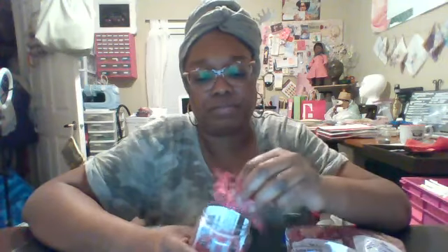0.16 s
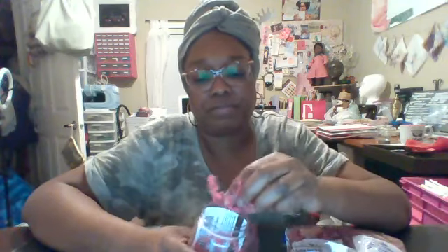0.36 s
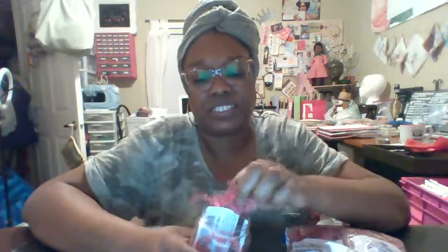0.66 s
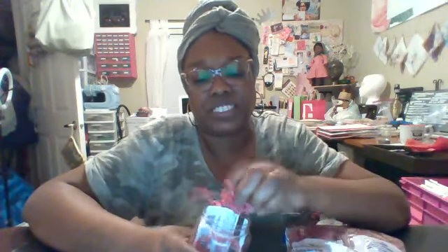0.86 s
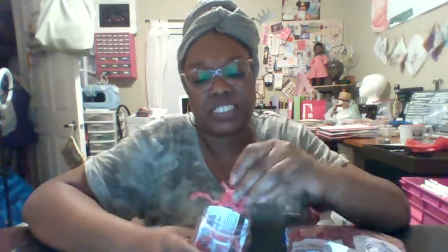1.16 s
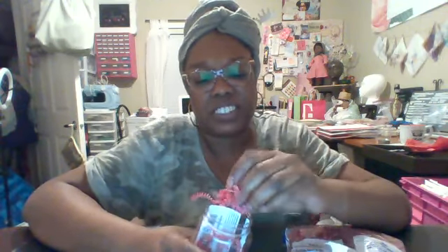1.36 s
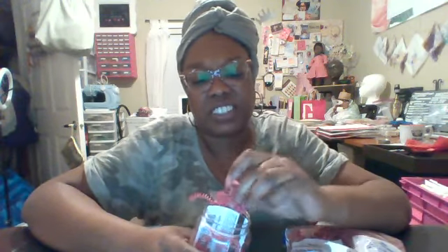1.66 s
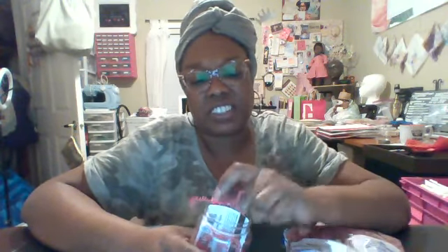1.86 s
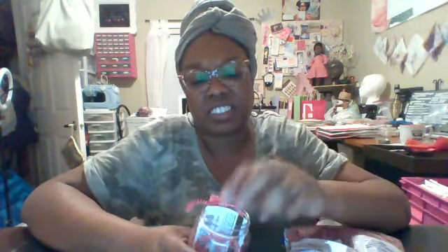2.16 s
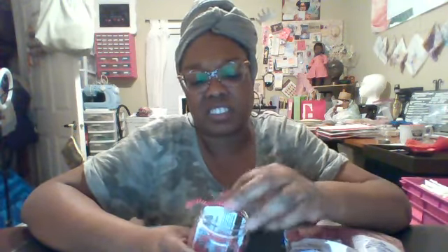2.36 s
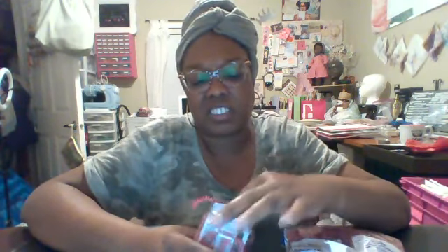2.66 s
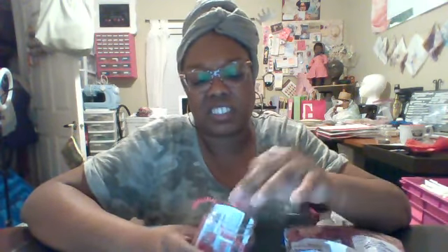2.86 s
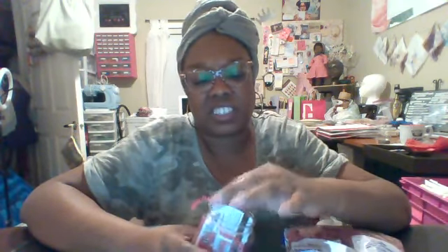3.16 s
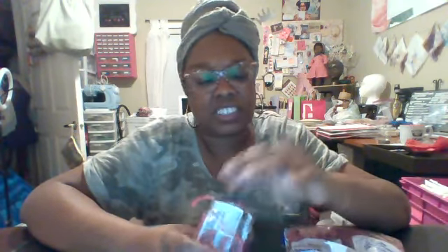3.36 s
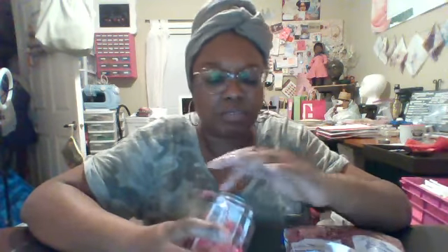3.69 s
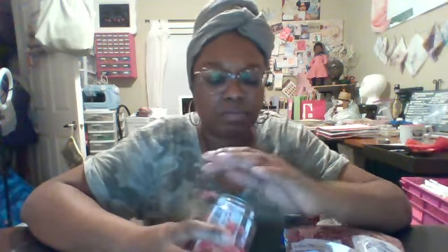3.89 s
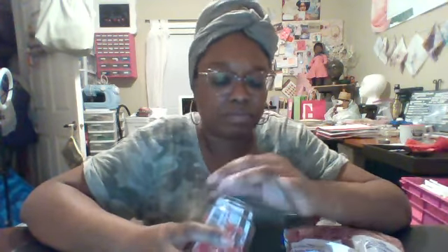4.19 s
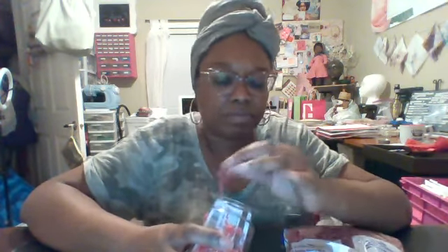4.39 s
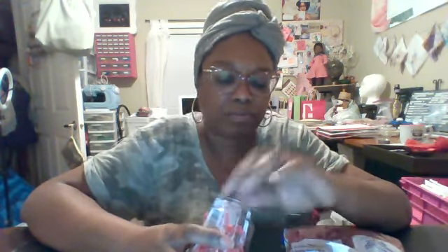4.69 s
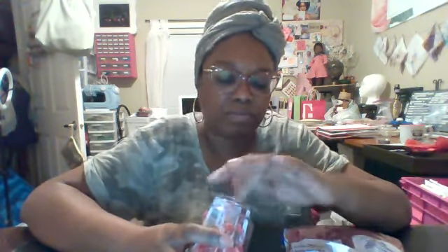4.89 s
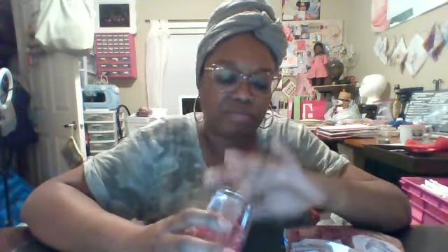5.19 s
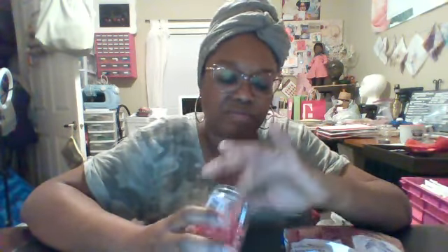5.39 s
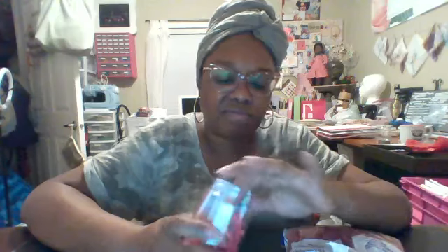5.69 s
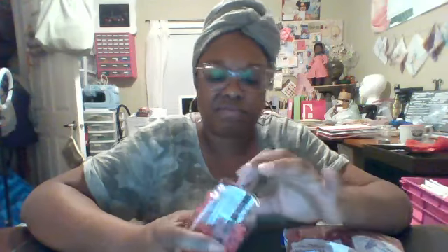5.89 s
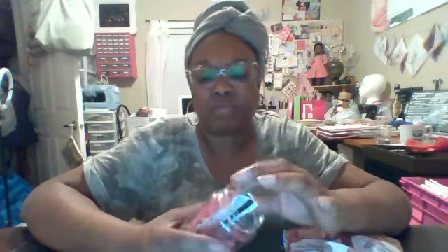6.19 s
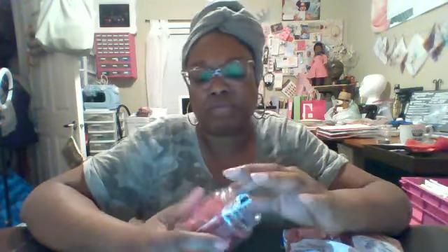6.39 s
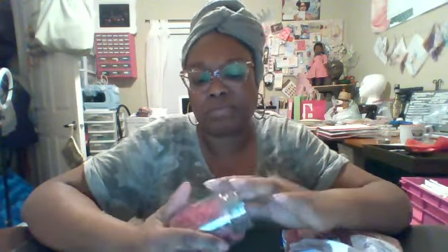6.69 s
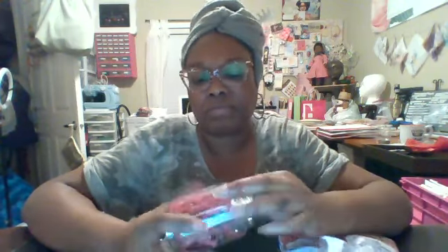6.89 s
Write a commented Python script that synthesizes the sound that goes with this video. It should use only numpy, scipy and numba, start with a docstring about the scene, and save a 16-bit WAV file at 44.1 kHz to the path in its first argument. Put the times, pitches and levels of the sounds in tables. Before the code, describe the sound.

Crinkly paper shreds are stuffed into a small plastic jar in uneven bursts, with sharp snaps, hollow plastic knocks and a quiet room's faint hum.

```python
"""Paper shreds in a plastic jar

A hand stuffs crinkled paper shreds into a small plastic jar, then turns the jar over, close to a microphone.
Strands rub and buckle in bursts of filtered noise and tiny ticks; paper and nails snap against the wall as
short noise pulses. Resonant filters make the jar's air and wall ring, also for drags over the plastic.
Low thuds are short dying tones: table bumps, and the short low body of one hard snap.
A small furnished room rumbles, hisses and hums faintly."""
import sys
import numpy as np
from scipy import signal
from scipy.fft import rfft, irfft, next_fast_len
from scipy.io import wavfile
from scipy.ndimage import uniform_filter1d
from numba import njit

SR = 44100
rng = np.random.default_rng(int(sys.argv[2]) if len(sys.argv) > 2 else 0)


def store_pcm(level_fs):
    """Save levels as 16-bit WAV."""
    pcm = np.round(np.clip(level_fs, -1, 1) * 32767).astype(np.int16)
    wavfile.write(sys.argv[1], SR, np.atleast_2d(pcm).T)


N = 310905
TIME = np.arange(N) / SR

# tone colour of the fine paper sizzle; only its shape counts: (frequency [Hz], level [dB])
SIZZLE_COLOUR = [(5500, -66), (7700, 2), (8700, 5.5), (10200, 4), (12500, 5), (15000, 4), (16500, -29.5)]
# pitch of the air in the jar, set by how far the hand covers its mouth: (time [s], pitch [Hz])
AIR_PITCH = [(0, 753), (1.3, 713), (1.85, 746), (2.4, 715), (5.2, 779), (5.4, 810), (5.5, 760), (5.7, 777),
             (6.15, 741), (6.72, 725), (6.85, 976), (6.93, 750), (7.05, 743)]
# how strong the difference between the two microphone ports is against their sum, before its bass is cut
PORT_SIDE_DB = -3


def undb(db):
    """Turn decibels into a gain."""
    return 10 ** (np.asarray(db) / 20)


def unit(x):
    """Scale a sound to an rms level of 1."""
    return x / np.sqrt(np.mean(x ** 2))


def colour(x, points):
    """Filter a sound through (Hz, dB) points without any sound before its cause (minimum phase)."""
    size = next_fast_len(x.shape[-1] + 2048) * 2
    hz, db = np.transpose(points)
    bin_hz = np.arange(size // 2 + 1) * SR / size
    gain_db = np.interp(np.log(bin_hz + 1), np.log(hz), db)
    # folding the cepstrum (the spectrum of the log gain) gives the matching phase
    cepstrum = irfft(np.log(undb(gain_db)))
    cepstrum[1:size // 2] *= 2
    cepstrum[size // 2 + 1:] = 0
    response = np.exp(rfft(cepstrum))
    return irfft(rfft(x, size) * response)[..., :x.shape[-1]]


def walk(rate):
    """Random wandering of rms 1: straight lines between chance values, `rate` of them per second."""
    k = int(SR / rate)
    steps = np.repeat(rng.standard_normal(N // k + 1), k)
    return unit(uniform_filter1d(steps, k)[:N])


def two_ports(pair, side_db, side_hz):
    """Mid and side to left and right: short waves reach the two ports differently, long ones alike."""
    diffuse = 0.61  # share of the side's power that is independent of the mid
    paths = rng.standard_normal(41)
    paths = paths - paths[::-1]
    shifted = np.convolve(pair[0], paths / np.linalg.norm(paths), "same")
    side = np.sqrt(diffuse) * pair[1] + np.sqrt(1 - diffuse) * shifted
    side = undb(side_db) * signal.lfilter(*signal.butter(1, side_hz, "high", fs=SR), side)
    return np.array([pair[0] + side, pair[0] - side])


@njit
def resonance(x, hz, width):
    """Band-pass filter whose centre may move, with gain 1 at the centre."""
    y, band, low = np.empty(len(x)), 0., 0.
    for i in range(len(x)):
        g, k = np.tan(np.pi * hz[i] / SR), width / hz[i]
        v = (band + g * (x[i] - low)) / (1 + g * (g + k))
        band, low, y[i] = 2 * v - band, low + 2 * g * v, k * v
    return y


def ring(x, hz, width):
    """One resonance at a fixed or moving pitch."""
    return resonance(np.ascontiguousarray(x), hz * np.ones(len(x)), float(width))


def double_ring(x, hz, width):
    """The same resonance twice in a row, for steeper sides."""
    return ring(ring(x, hz, width), hz, width)


def jar_air(x, hz):
    """The air in the jar rings like a short closed pipe, with dark valleys between its resonances."""
    # air resonances: (multiple of the air pitch, width of each filter pass [Hz], level [dB])
    air_modes = [(1, 140, 0), (2.9, 330, -20), (3.35, 330, -21)]
    return sum(undb(db) * double_ring(x, hz * multiple, width) for multiple, width, db in air_modes)


def wall_spot(x, hz):
    """The struck patch of plastic rings for a few cycles, on top of the blow itself."""
    q = 13  # sharpness: pitch divided by width
    # resonances of a struck spot: (multiple of its ring pitch, level [dB])
    spot_modes = [(1, 9), (1.65, -1.5)]
    return x + sum(undb(db) * ring(x, hz * multiple, hz * multiple / q) for multiple, db in spot_modes)


def crinkles(per_s, spread_db, slide_db):
    """Tiny buckles of very unequal size over the smooth hiss of sliding strands."""
    happens = rng.random(N) < per_s / SR
    sizes = happens * undb(spread_db * np.minimum(rng.exponential(size=N), 4.5))
    decay_s = 0.0015
    bursts = signal.lfilter([1], [1, -np.exp(-1 / (decay_s * SR))], sizes)
    buckles = unit(bursts * rng.standard_normal((2, N)))
    hiss = undb(slide_db) * rng.standard_normal((2, N))
    return unit(buckles + hiss)


def room_tone():
    """Steady low rumble and faint hiss from filtered noise, with a hum of wavering phase and level."""
    floor_db, hum_hz, hum_db = -55.0, 121, -71
    # tone colour of the quiet room; only its shape counts: (frequency [Hz], level [dB])
    tone_colour = [(20, -1.5), (33, -3), (48, 2.5), (70, -4), (100, -12), (125, -5.5), (160, -16),
                   (250, -23), (350, -27.5), (440, -26.5), (600, -33.5), (1500, -39), (6000, -43),
                   (16000, -42)]
    mid, side = colour(rng.standard_normal((2, N)), tone_colour)
    air = unit(mid + np.array([[.32], [-.32]]) * side)
    hum = np.sqrt(2) * np.sin(2 * np.pi * hum_hz * TIME + 1.24 * walk(12))
    hum *= undb(hum_db + 1.0 * walk(3.6))
    return undb(floor_db) * air + hum


def snaps():
    """Each snap is a quick chain of buckles that rings the struck spot, followed by the shreds settling."""
    # rise and fall time constants, as shares of a snap's length
    lead, fade = .5, 1.65
    # the settling shreds: starting level against the chain, and decay time
    tail_db, tail_s = -19, 0.0053
    spike = 0.8  # how uneven the buckles are
    # stiffer spots crack harder: the crack has the snap's level at this ring pitch and grows with it
    crack_even_hz, crack_db_per_octave = 2130, 3.5
    pan_db = 0.5  # left minus right
    # snaps of paper and nails on the jar; a bright one is mostly paper, a dull one mostly wall:
    # (time of peak [s], length scale [s], level as rms over 8 ms [dB],
    #  brightness, added to sizzle and taken from knock [dB], jar air against level [dB], ring pitch [Hz])
    snap_list = [(0.035, .002, -59, 10, -11, 2550), (0.045, 0.0017, -47, -11.5, 11.5, 2540),
                 (0.076, 0.0035, -49.5, 12, -2, 3630), (.1715, 0.0018, -42, -2.5, -4, 3980),
                 (0.339, 0.0014, -56, 9, -6, 4350), (0.368, 0.0079, -46, 6.5, -3, 2470),
                 (.436, 0.002, -44.5, 4.5, -25, 4530), (.6588, 0.003, -34.5, -2, -20, 1590),
                 (0.7414, .0018, -37, 6.5, -20, 3520), (0.964, .0023, -51.5, -5, 3.5, 2030),
                 (1.183, 0.0032, -55.5, 7, 2.5, 2290), (1.338, .006, -50.5, 2, -4, 2450),
                 (1.433, .003, -47, 7, -2, 2490), (1.47, .002, -57, -4, 7, 2300),
                 (1.684, 0.0045, -51.5, -1, -8, 4300), (1.8177, .0035, -53, -1, 4, 1430),
                 (1.8598, 0.0043, -39.5, 3, -0.5, 1290), (1.8925, .0047, -41.5, 6.5, -19, 2290),
                 (1.914, .0036, -50, 7, 1, 3540), (1.9338, 0.0023, -36.5, 4.5, -8, 4800),
                 (1.945, 0.0032, -38, -2, -18, 3150), (1.9745, .0008, -49, -12.5, -13, 1310),
                 (2.054, .004, -46.5, -9.5, -23, 2300), (2.071, 0.0022, -40.5, -3, -7, 2210),
                 (2.383, 0.0041, -44, -1.5, 4.5, 3600), (2.9207, 0.002, -58, -8.5, 3.5, 2450),
                 (3.006, 0.0019, -51.5, -4, -3, 2360), (3.0727, 0.0024, -46.5, -0.5, -5.5, 2050),
                 (3.4575, 0.00073, -60.5, 7.5, -20, 4970), (3.5226, .001, -59, 20.5, -13, 4650),
                 (3.5405, 0.0036, -49, 3, -9, 1430), (3.565, 0.0055, -51, 17.5, -19, 4400),
                 (4.37, 0.0028, -42, -4.5, -2.5, 1310), (4.399, 0.0051, -42, -2.5, 1.5, 1250),
                 (5.209, .0043, -35, 0.5, 4, 3040), (5.398, 0.0027, -38, 11.5, -10.5, 5060),
                 (5.4713, .0022, -53, 1, 5, 2330), (6.141, 0.0018, -52, -2.5, 16.5, 2260),
                 (6.215, 0.0016, -54, -0.5, -14, 1370), (6.4264, 0.00034, -55, -18.5, -2, 1920),
                 (6.735, 0.0015, -47, 0, -10, 1220), (6.828, 0.0035, -65, -9, 11, 1840),
                 (6.852, 0.0018, -51.5, -4, 10, 1220), (6.941, 0.0018, -47, -0.5, -3, 3150),
                 (6.999, 0.0033, -43.5, 1, -3, 2020), (7.012, 0.0073, -39.5, -1.5, -9, 1360),
                 (7.035, .0026, -46, 0, 8, 1360)]
    # tone colour of the knock on the wall; only its shape counts: (frequency [Hz], level [dB])
    knock_colour = [(100, -26), (300, -14), (550, -11), (800, -8), (1250, -1), (2000, 0), (2700, -2),
                    (3400, -4), (4200, -20), (8000, -45)]
    # tone colour of the crack; only its shape counts: (frequency [Hz], level [dB])
    crack_colour = [(1500, -16.5), (2800, 3), (3600, 6), (5000, 4), (7000, 3), (9000, -5), (15000, -54)]

    out = np.zeros((2, N + SR))
    t = np.arange(-256, 4096) / SR
    blow = .008 * SR  # samples over which the levels count
    pan = undb(np.array([[pan_db], [-pan_db]]) / 2)
    for s, length, level_db, bright_db, hollow_db, ring_hz in snap_list:
        knock_db, sizzle_db, air_db = level_db - bright_db, level_db + bright_db, level_db + hollow_db
        crack_db = level_db + crack_db_per_octave * np.log2(ring_hz / crack_even_hz)
        air_hz = np.interp(s, *np.transpose(AIR_PITCH))
        span = abs(t) / max(length, 1e-4)
        settling = undb(tail_db) * np.exp(-abs(t) / tail_s)
        shape = np.where(t < 0, np.exp(-span / lead), np.exp(-span / fade) + settling)
        # the chain peaks for a moment as the main fold gives way
        shape = shape * (1 + .9 * np.exp(-abs(t) / .0004))
        unevenness = np.exp(spike * np.clip(rng.standard_normal(len(t)), -2, 2))
        chain = shape * rng.standard_normal((2, len(t))) * unevenness
        # the hardest contact is one sharp push on the wall
        push = chain / np.sqrt(np.sum(chain[0] ** 2))
        push[0, np.argmin(abs(t))] += 1.1
        air = jar_air(push[0], air_hz) * np.ones((2, 1))
        push = np.array([wall_spot(x, ring_hz) for x in push])
        chain = np.array([wall_spot(x, ring_hz) for x in chain])
        # a small, stiff spot radiates little bass
        push = signal.lfilter(*signal.butter(1, .3 * ring_hz, "high", fs=SR), push)
        knock = two_ports(colour(push, knock_colour), PORT_SIDE_DB, side_hz=1540)
        crack = two_ports(colour(chain, crack_colour), PORT_SIDE_DB, side_hz=2020)
        sizzle = two_ports(colour(chain, SIZZLE_COLOUR), PORT_SIDE_DB, side_hz=2000)
        parts = [(air, air_db), (knock, knock_db), (crack, crack_db), (sizzle, sizzle_db)]
        start = max(int((s + t[0]) * SR), 0)
        for part, db in parts:
            out[:, start:start + len(t)] += unit(part) * undb(db) * pan * np.sqrt(blow / len(t))
    return out[:, :N]


def stroke_levels():
    """Levels of rustle, sizzle and jar air: each stroke builds, arches and dies away; overlaps add in power."""
    # time constants of every stroke, and how far its ends lie under its middle
    attack_s, release_s, arch_db = 0.02, 0.027, 0.48
    rest_db = -75  # the wad keeps stirring faintly between strokes
    # strokes of the hand through the paper, levels before the arch is applied:
    # (start [s], length [s], rustle level [dB], sizzle against rustle [dB], jar air against rustle [dB])
    stroke_list = [(0.037, 0.058, -51, 3.5, -22), (0.145, 0.086, -55.5, 4.5, -26),
                   (0.319, 0.074, -50.5, -1, -8.5), (0.448, 0.036, -54.5, 1, -20.5),
                   (0.547, 0.062, -56.5, 2, -8), (0.677, 0.082, -51, 2.0, -8.5),
                   (0.825, 0.081, -45.5, 0.5, -11), (1.016, 0.05, -51, 0.5, -7),
                   (1.159, 0.17, -60.5, 7.5, -0.5), (1.289, 0.16, -54.0, 4.5, -14),
                   (1.513, 0.1, -61, 5.0, -9), (1.753, 0.066, -50, -1.0, -7), (1.896, 0.063, -43, -3, -15),
                   (2.053, 0.019, -44.0, -7, -18), (2.136, 0.019, -49, 4.5, -3.5),
                   (2.392, 0.053, -49, -1, -11), (2.508, 0.095, -53.5, 2, -6.5),
                   (2.692, 0.013, -51, 0.5, -2), (2.767, 0.043, -50.5, 1, -8.5),
                   (2.932, 0.073, -54.5, 0.5, -22), (3.03, 0.053, -60.5, -3.5, -30),
                   (3.225, 0.055, -52.0, -4.5, -13), (3.387, 0.031, -58.5, -1.5, -13),
                   (3.536, 0.043, -51.5, 1, -24), (3.927, 0.014, -65, -1, -6),
                   (4.176, 0.043, -64.5, -2, -0.5), (4.247, 0.066, -64, 3.5, -7), (4.4, 0.07, -57, -3, -17),
                   (4.88, 0.1, -73, 6.5, -14.0), (5.176, 0.088, -52, -2, -3.5),
                   (5.29, 0.14, -55.5, -2.5, -3.5), (5.48, 0.04, -66.5, -3, 3.5),
                   (5.648, 0.14, -63.5, -3, -1), (5.849, 0.049, -57.5, 1, -11), (6.112, 0.2, -64, -9, -4),
                   (6.357, 0.14, -59, -3, -4.5), (6.647, 0.058, -53.5, -5.5, 12.5),
                   (6.742, 0.052, -58.0, -5, -17), (6.852, 0.1, -54, -9.5, -11.5),
                   (6.984, 0.087, -48.5, -14, -0.5)]
    power = np.full((3, N), undb(rest_db) ** 2) * np.array([[1], [1], [0]])
    for start, length, db, sizzle_db, air_db in stroke_list:
        t = TIME - start
        arch = undb(arch_db * (np.sin(np.pi * np.clip(t / length, 0, 1)) - 1.5))
        build = np.minimum(t, 0) / attack_s
        relax = np.maximum(t - length, 0) / release_s
        shape = arch * np.exp(build - relax)
        peak_power = undb([db, db + sizzle_db, db + air_db]) ** 2
        power += np.outer(peak_power, np.maximum(shape, 1e-6) ** 2)
    return 10 * np.log10(power)


def ticks(per_s, spread_db):
    """Single folds flicking over: each is a crisp tick of a few cycles at its own pitch."""
    count = 7000  # candidates, of which chance keeps enough for the wanted rate
    t = np.arange(200) / SR
    when, pitch, size, turn, chance = rng.random((count, 5)).T[:, :, None]
    hz = 1500 + 13000 * pitch ** 1.5
    kept = chance < per_s * N / SR / count
    # higher ticks die sooner, so they start stronger
    gain = np.sqrt(hz) * undb(spread_db * np.minimum(-np.log(1 - size), 4)) * kept
    folds = gain * np.exp(2j * np.pi * (hz * t + turn) - t * hz / 6)
    places = (when * N).astype(int) + np.arange(len(t))
    mid_side = (folds.real, folds.imag * np.cos(np.pi * when * N))
    out = [np.bincount(places.ravel(), part.ravel(), N)[:N] for part in mid_side]
    return unit(np.array(out))


def paper():
    """The wad rubs along the wall in small catches and slips, and stirs the air in the jar."""
    # rustle level around which folds start to give way, and how gradually
    crunch_db, crunch_range_db = -52, 5
    # the finest fibres whisper at the very top when the touch is light: centre and width of each filter
    # pass, level against the sizzle, and growth in dB per dB of sizzle over rustle
    fibre_hz, fibre_width_hz, fibre_db, fibre_growth = 14150, 3700, -9.5, 1
    # tone colour of the rustle; only its shape counts: (frequency [Hz], level [dB])
    rustle_colour = [(120, -10.5), (200, -1), (330, -8), (450, 2), (600, 1), (1050, -2.5), (1700, -7.5),
                     (2200, -3), (3000, -5.5), (4300, -3.5), (6500, -8.5), (7600, -6.5), (9000, -27)]

    rustle_db, sizzle_db, air_db = stroke_levels()
    catches = undb(3.46 * walk(110))
    rubbing = crinkles(per_s=1100, spread_db=1.0, slide_db=3.5) * catches
    # a light touch only slides; folds give way when the hand presses harder
    pressure = 1 / (1.5 + np.exp((crunch_db - rustle_db) / crunch_range_db))
    folds = 1.4 * ticks(per_s=520, spread_db=4.6) * catches
    grains = (rubbing + pressure * folds) / np.hypot(1, pressure)

    rustle = unit(two_ports(colour(grains, rustle_colour), PORT_SIDE_DB, side_hz=2100)) * undb(rustle_db)
    sizzle = unit(two_ports(colour(grains, SIZZLE_COLOUR), PORT_SIDE_DB, side_hz=2100)) * undb(sizzle_db)

    fine_grains = crinkles(per_s=540, spread_db=2.0, slide_db=6) * catches
    finest = [double_ring(x, fibre_hz, fibre_width_hz) for x in fine_grains]
    whisper_db = sizzle_db + fibre_db + fibre_growth * (sizzle_db - rustle_db)
    fibres = unit(two_ports(finest, PORT_SIDE_DB, side_hz=2100)) * undb(whisper_db)

    stirring = rubbing[0] * undb(2 * walk(60))
    air_hz = np.interp(TIME, *np.transpose(AIR_PITCH))
    air = unit(jar_air(stirring, air_hz)) * undb(air_db)
    return rustle + sizzle + fibres + air


def low_thuds():
    """Low tones that rise at once and die away: table bumps, and the short low body of a hard snap."""
    rise_s = 0.00083
    # low thuds: table bumps, and the short low body of the hard snap at .659 s:
    # (time [s], pitch [Hz], peak level before rise and decay [dB], decay time constant [s])
    thud_list = [(.659, 326, -30, 0.0022), (1.122, 60, -40, 0.06), (1.14, 129.4, -40.5, 0.028),
                 (2.025, 63.5, -53, .025), (3.524, 92, -34.5, 0.022), (3.55, 150, -33, 0.0096),
                 (3.632, 94, -33.5, 0.013), (4.194, 51.7, -44.5, 0.086)]
    out = np.zeros(N)
    for s, hz, db, decay in thud_list:
        t = np.maximum(TIME - s, 0)
        swing = np.sin(2 * np.pi * hz * t)
        out += undb(db) * swing * (1 - np.exp(-t / rise_s)) * np.exp(-t / decay)
    return out


def drags_and_low_body():
    """Crinkle noise rings a resonance: drags over the plastic, and the low body under some snaps."""
    # drags over the plastic, and the low body under the snaps near 1.95 s:
    # (middle [s], quarter of the whole length [s], pitch [Hz], width before widening [Hz],
    #  rms level before the swell [dB])
    swell_list = [(1.29, 0.19, 2310, 450, -63.5), (1.818, 0.051, 1270, 1010, -55),
                  (1.97, 0.044, 430, 400, -59.5), (1.98, 0.016, 1400, 700, -52),
                  (2.056, 0.0088, 410, 402, -49), (3.622, 0.072, 344, 454, -61.5),
                  (3.931, 0.0078, 2150, 400, -67), (4.185, 0.016, 1940, 383, -63.5),
                  (4.297, 0.027, 2140, 383, -63.5), (4.798, 0.03, 430, 59.6, -71.5),
                  (6.256, 0.089, 477, 334, -57.5), (6.67, 0.082, 2060, 300, -66),
                  (6.995, 0.057, 433, 400, -53), (7.022, 0.031, 1250, 400, -47.5)]
    slips = crinkles(per_s=420, spread_db=9.0, slide_db=-0.5)[0]
    out = np.zeros(N)
    for s, quarter, hz, width, db in swell_list:
        near = abs(TIME - s) < 2 * quarter
        swell = np.cos(np.pi * (TIME[near] - s) / quarter / 4)
        ringing = ring(ring(slips[near], hz, 1.7 * width), hz, 1.95 * width)
        out[near] += unit(ringing) * undb(db) * swell
    return out


def room(x):
    """Early reflections from table and hands, then the short, dull reverberation of a cluttered room."""
    # reverberation: time to fall by 60 dB, level, and where the treble starts to fall
    t60_s, wet_db, dull_hz = 0.25, -19.5, 6100
    # early reflections: level and decay time constant
    near_db, near_s = -10.5, 0.0099
    t = np.arange(SR // 2) / SR
    tail = rng.standard_normal((2, len(t))) * undb(-60 * t / t60_s) * (t > .005)
    tail = two_ports(tail, side_db=-6.0, side_hz=1230)
    tail = signal.lfilter(*signal.butter(1, dull_hz, fs=SR), tail)
    tail *= undb(wet_db) / np.sqrt(np.sum(tail ** 2) / 2)
    near = rng.standard_normal((2, len(t))) * np.exp(-t / near_s) * (t > .0005)
    near = two_ports(near, side_db=-9, side_hz=1510)
    near = signal.lfilter(*signal.butter(2, 1300, "high", fs=SR), near)
    near *= undb(near_db) / np.sqrt(np.sum(near ** 2) / 2)
    return x + signal.fftconvolve(x, tail + near, axes=1)[:, :N]


def scene():
    """Paper and jar echo in the room; low thuds and room tone are added without echo."""
    jar = paper() + snaps() + drags_and_low_body()
    return room(jar) + low_thuds() + room_tone()


def record(dry):
    """The recorder cuts the highest treble steeply."""
    top_hz = 16350
    return signal.sosfilt(signal.ellip(10, .2, 70, top_hz, fs=SR, output="sos"), dry)


dry = scene()
out = record(dry)
store_pcm(out)
```